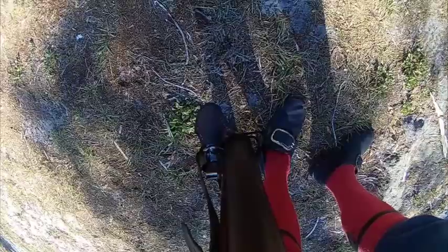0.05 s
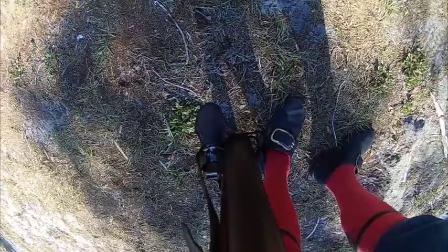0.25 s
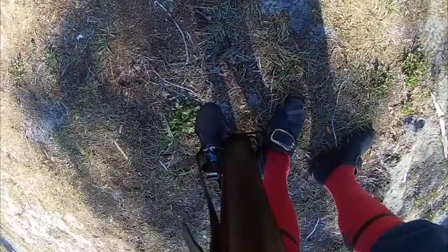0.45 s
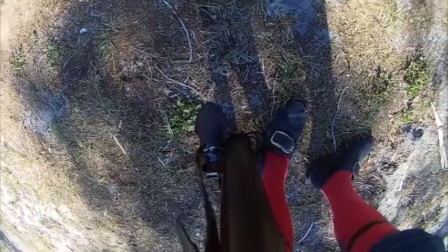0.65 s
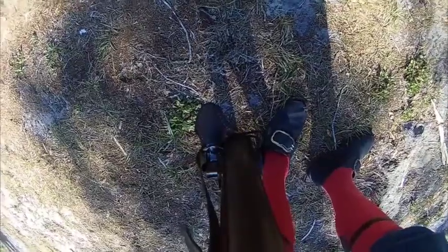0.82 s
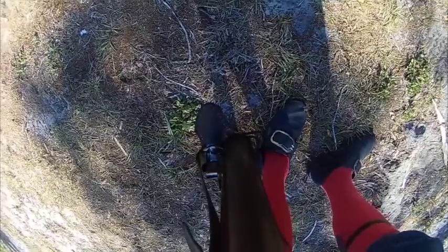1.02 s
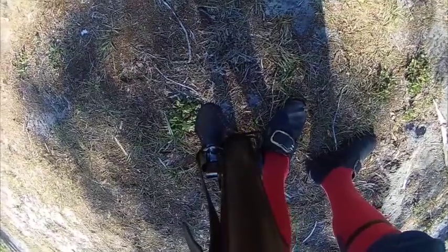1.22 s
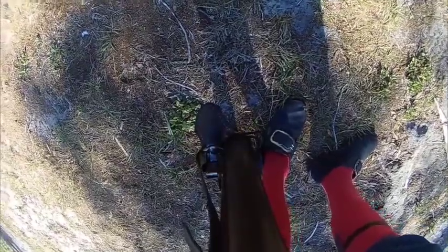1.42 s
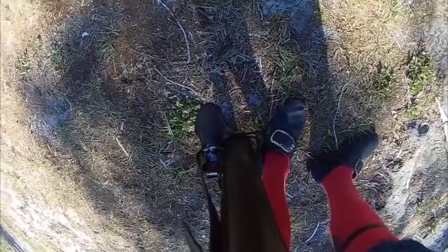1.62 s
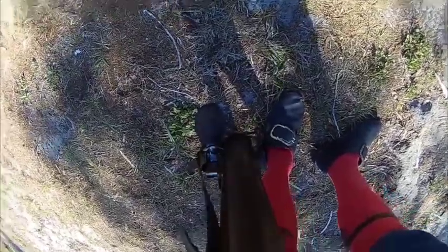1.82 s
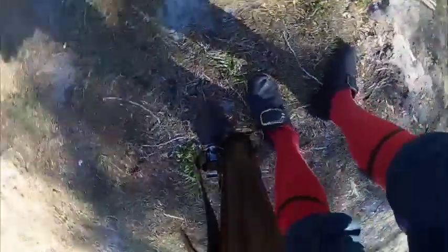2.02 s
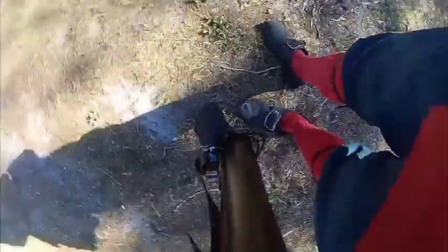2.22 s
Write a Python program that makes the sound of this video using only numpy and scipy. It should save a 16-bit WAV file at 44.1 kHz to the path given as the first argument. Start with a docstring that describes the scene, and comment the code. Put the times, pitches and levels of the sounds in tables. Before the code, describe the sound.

A ramrod scrapes and rattles inside a musket barrel, then knocks home once.

```python
"""Light taps and a thin scrape come first: a ramrod in a musket barrel, outdoors. It rattles and judders,
stops, slides once more and knocks home; then hands shift the gun. Every contact rings the barrel and
wooden stock, which carry it straight into the microphone of a camera fixed to the gun.
That close, the hard blows overload the microphone; the open air adds no echo, only a quiet floor."""
import sys
import numpy as np
from scipy import signal
from scipy.fft import rfft, irfft, next_fast_len
from scipy.io import wavfile
from scipy.ndimage import uniform_filter1d, map_coordinates

SR = 44100
rng = np.random.default_rng(int(sys.argv[2]) if len(sys.argv) > 2 else 0)


def dump_mix(stems):
    """Bounce the given channels to the path in sys.argv[1] as a 16-bit WAV at rate SR."""
    frames = np.atleast_2d(stems).T  # one column per channel
    limited = np.clip(frames, -1, 1)  # hard clip at full scale
    pcm = np.round(limited * 32767).astype(np.int16)
    wavfile.write(sys.argv[1], SR, pcm)


N = 103635


def amp(db):
    """Decibels to gain."""
    return 10 ** (np.asarray(db) / 20)


def unit(x):
    """Scale to rms 1."""
    return x / np.sqrt(np.mean(x ** 2) + 1e-20)


def levelled(x):
    """Scale so that the loudest moment has rms 1."""
    return x / np.sqrt(uniform_filter1d(x ** 2, size=400).max())


def gain_at(spectrum, hz):
    """Gain between (freq_hz, level_db) points on a log frequency axis."""
    freq_hz, level_db = np.transpose(spectrum)
    return amp(np.interp(np.log(hz + 1), np.log(freq_hz + 1), level_db))


def filtered(x, response):
    """Filter x by a complex response of frequency."""
    size = next_fast_len(len(x) + SR // 2)
    return irfft(rfft(x, size) * response(np.fft.rfftfreq(size, 1 / SR)), size)[:len(x)]


def noise(spectrum, size=N):
    """White noise coloured by (freq_hz, level_db) points."""
    return filtered(rng.standard_normal(size), lambda hz: gain_at(spectrum, hz))


def wobble(rate_hz, size):
    """A random curve with rate_hz knots a second."""
    return map_coordinates(rng.standard_normal(size // 8), [np.arange(size) * rate_hz / SR], order=1)


def add(track, start_s, sound):
    """Mix a sound in at start_s."""
    part = track[round(start_s * SR):][:len(sound)]
    part += sound[:len(part)]


# Spectrum of the open air around the microphone: freq_hz, level_db
AIR_SPECTRUM = [(20, 6.5), (120, 4.5), (300, -5.5), (700, -12), (1500, -15.5), (4000, -24), (9000, -27),
                (16000, -28.5)]

def outdoor_floor(level_db=-44.5):
    """A quiet, steady background, mostly bass."""
    return amp(level_db) * unit(noise(AIR_SPECTRUM))


# Resonances of barrel, stock and camera mount: centre_hz, width_hz, level_db
GUN_MODES = [(32.35, 5.2, -8.5), (107.9, 27, 5), (148.9, 34.4, 6.5), (190.6, 36, -0.5), (242.1, 27.7, 5),
             (293.45, 23.8, 8), (531, 45, 1.5), (698, 99, -6.5), (792, 52, -8), (917.3, 30, 6.5),
             (1268, 70, -4.5), (1363.5, 49, -3), (1548, 83, -0.5), (1728.5, 65.7, -1), (1943, 87.4, -11.5),
             (2640, 360, -22), (2900, 170, -18.5), (3515, 410, -19), (5600, 340, -22.5)]
# What the mount passes from gun to microphone: freq_hz, gain_db
MOUNT_RESPONSE = [(20, 2), (3800, -6), (4400, -23), (6000, -27), (9000, -26.5), (16000, -23.5)]

def gun(force, detune=0):
    """A force rings the gun, heard through the mount; white noise keeps its level."""
    def response(hz):
        f = hz * (1 + detune * (hz > 400))  # only the upper resonances shift
        modes = sum((-1) ** k * amp(db) * 1j * f * width / (centre ** 2 - f ** 2 + 1j * f * width)
                    for k, (centre, width, db) in enumerate(GUN_MODES))
        at_mic = modes * gain_at(MOUNT_RESPONSE, hz)
        return at_mic / np.sqrt(np.mean(abs(at_mic) ** 2))
    return filtered(force, response)


# Loudness of the hands at the microphone: time_s, level_db
RUB_LEVELS = [(0, -51), (.3, -30), (0.878, -22.5), (0.959, -52), (1.081, -50), (1.22, -51), (1.34, -43),
              (1.6, -31.5), (1.702, -37), (1.862, -28.5), (1.98, -42), (2.2, -35.5), (2.35, -32)]
# Spectrum of their force on the wood: freq_hz, level_db
RUB_SPECTRUM = [(20, 10), (45, 24.5), (100, 1.5), (300, -4), (550, -8.5), (1000, -12), (2000, -14),
                (5000, -4)]

def hand_rub():
    """Hands rub the stock, a low rustle that swells and fades."""
    level_db = np.interp(np.arange(N) / SR, *np.transpose(RUB_LEVELS))
    return amp(level_db) * unit(gun(noise(RUB_SPECTRUM)))


def push(width_s, pitch_hz=0, length_s=0.5):
    """A soft push, or a brief rocking at pitch_hz, rings the gun's low resonances; peak 1."""
    t = np.arange(int(length_s * SR)) / SR
    ring = gun(t ** 2 * np.exp(-t / width_s) * np.cos(2 * np.pi * pitch_hz * t))
    return ring / abs(ring).max()


def friction(bass_db, low_mid_db, treble_db, size=N, rough_db=1, catch_hz=301.3):
    """Force of steel rubbing steel, in tiny uneven catches."""
    colour = [(300, bass_db), (500, low_mid_db), (950, low_mid_db),
              (1400, 0.013), (1900, 0.014), (2800, treble_db)]
    return noise(colour, size) * unit(amp(rough_db * wobble(catch_hz, size)))


def rod_ping(t, range_hz=(687.7, 2004.3), t60_s=0.063):
    """Two bending modes of the rod, at pitches that vary with the point struck."""
    pitch_hz = rng.uniform(*range_hz, (2, 1))
    return np.sin(2 * np.pi * pitch_hz * t).sum(0) * amp(-60 * t / t60_s)


# The rod strikes the bore, within a gun's length of the microphone:
# start_s, level_db, chatter_t60_s, low_mid_db, treble_db, thud_db
ROD_BLOWS = [(0.0493, -20, 0.043, -8, -5, -19), (0.075, -18.5, 0.069, -7.5, -0.5, -54),
             (0.14, -21, 0.021, -11, -3.5, -19), (.184, -22.5, 0.15, 3, -15, -19.5),
             (.206, -14, 0.097, -8.5, 0, -35), (0.217, -12.5, 0.063, 0.5, -21, -47),
             (0.3347, -5, 0.023, -1.5, -4, -4.5), (0.3429, -3.5, 0.043, 19, 3, -1),
             (0.432, -24.5, 0.024, 1.5, -2, -25), (0.451, -12.5, 0.024, 3, 1, -29),
             (.494, -2, 0.026, 3, -8, -19), (.502, -21, 0.12, -13.5, -11, -40),
             (.558, -3, 0.029, 1, 10.5, -1.5), (0.6257, 2, 0.034, -4, 9.5, -14),
             (0.6632, 8.5, 0.038, -0.5, 13.5, 5.5), (0.681, 0.5, 0.018, 11, 1, 5.5),
             (.707, 4, 0.043, 1.5, 6, 9), (0.7363, 0, 0.012, 0, 6, 0), (0.7546, 6, 0.06, -3.5, -30, -7),
             (0.777, 3.5, 0.024, 8.5, 6, 5.5), (.787, 1.5, 0.079, -7.5, 12, -3.5),
             (.802, 4.5, 0.013, 9.5, -18, -4), (0.828, -6, 0.017, -12, -10, 1.5),
             (0.847, -8, 0.0295, 9, 8, -1), (0.8697, -10, 0.034, -23, 4, -2.5),
             (0.8752, -4.5, 0.022, 6.5, 0, -28), (1.4743, 8, 0.019, 0.5, 0.5, 2),
             (1.612, -27, 0.016, -17, -7, -52), (1.644, -31.5, 0.061, 0, -9, -42.5),
             (1.812, -22.5, 0.022, -2.5, 12.5, -24), (2.115, -27, 0.04, 3.5, -4, -27),
             (2.283, -33, 0.066, -3.5, -0.5, -16.5)]

def rod_blows(ping_db=-4.5, detune_spread=0.025):
    """Each blow is a thud, a ping and a quickly dying chatter of the rod against the bore."""
    out = np.zeros(N)
    thud = push(width_s=0.0007)
    t = np.arange(len(thud)) / SR
    for start_s, level_db, chatter_t60_s, low_mid_db, treble_db, thud_db in ROD_BLOWS:
        bass_db = low_mid_db - 2.5
        force = amp(-60 * t / chatter_t60_s) * friction(bass_db, low_mid_db, treble_db, len(t))
        detune = rng.normal(0, detune_spread)  # the rod's place in the bore shifts the resonances
        chatter = levelled(gun(force, detune))
        ping = amp(ping_db + min(level_db, 0) / 2) * rod_ping(t)  # light taps barely ring the rod
        add(out, start_s, amp(level_db) * levelled(chatter + ping) + amp(thud_db) * thud)
    return out


# Strokes of the rod along the bore, heard through the gun:
# start_s, end_s, first_db, last_db, bass_db, low_mid_db, treble_db, squeal_hz, squeal_db
ROD_SLIDES = [(0.07, 0.2, -41.5, -32, -4.5, 3, -2, 910, -31),
              (0.248, 0.329, -28.5, -14.5, -11.5, 2.5, 4.5, 1780, 1),
              (0.424, 0.478, -53, -26, -6.5, -23, 7, 1580, 11.5),
              (0.52, 0.577, -22, -19, 12, 2.5, 16, 950, -1), (0.557, .612, -18, -24, 9.5, 1, 8, 1000, 6.5),
              (0.608, 0.663, -6, -11.5, 4, 2.5, 1.5, 1400, -11),
              (0.678, 0.771, -7.5, -7.5, 12, 4.5, 11.5, 1400, 7),
              (.775, 0.817, 1.5, -10, 8, -2, 1, 746, 21), (0.819, 0.869, -8.5, -13, 8.5, -3, 9.5, 900, 3),
              (0.884, 0.904, -21, -24.5, 10.5, 3, 4, 930, -10),
              (1.377, 1.417, -28, -16.5, -8, -3.5, 7.5, 3830, -3),
              (1.402, 1.469, -20, -12.5, -14, -9, 13.5, 5700, -2),
              (1.56, 1.588, -41, -40, -12, 3, 19, 3430, 2),
              (1.59, 1.612, -26, -31, -32, -1.5, 13, 3130, -5),
              (1.709, 1.723, -22, -26, -18, -19, 4, 5700, 15),
              (1.744, 1.757, -7, -18.5, -28, -16.5, -1, 5650, 14),
              (1.769, 1.797, -22.5, -28.5, -25, -15, -1, 1720, 7.5),
              (2.154, 2.183, -33, -54, 13, 3.5, -13, 1000, 3),
              (2.311, 2.36, -27.5, -21.5, -7, -8.5, 6.5, 4630, 13)]

def rod_slides(edge_s=0.011, squeal_octaves=0.16, judder_db=6.5, judder_hz=131, judder_onset_db=-26):
    """Friction grows or eases along each stroke and squeals in one band; pressed hard, the rod judders."""
    t, force = np.arange(N) / SR, np.zeros(N)
    for start_s, end_s, first_db, last_db, *colour_db, squeal_hz, squeal_db in ROD_SLIDES:
        def squeal(hz):
            octaves_off = np.log2((hz + 1) / squeal_hz)
            return 1 + amp(squeal_db) * np.exp(-(octaves_off / squeal_octaves) ** 2)
        gate = np.clip(np.minimum(t - start_s, end_s - t) / edge_s + 0.5, 0, 1)
        level_db = np.interp(t, [start_s, end_s], [first_db, last_db])
        pressure = np.clip(1 - level_db / judder_onset_db, 0, 1)
        stick_slip_db = judder_db * pressure * (wobble(judder_hz, N) - 0.5)
        scrape = filtered(friction(*colour_db), squeal)
        force += gate * amp(level_db + stick_slip_db) * scrape
    return gun(force)


# Dull thumps of the stock, carried up the mount: start_s, peak_db, pitch_hz
STOCK_THUMPS = [(0.23, -14.5, 140), (.343, 4, 160), (0.376, -13.5, 134), (.564, -2, 120), (0.581, 3.5, 116),
                (0.599, -5, 116), (.885, -26.5, 280), (0.921, -24.5, 272), (0.954, -30.5, 205),
                (1.246, -23.5, 125), (1.483, 3, 112), (1.756, -23.5, 130), (1.809, -15, 143),
                (1.862, -22, 130), (1.914, -30, 220), (2.053, -21.5, 173), (2.163, -20.5, 150),
                (2.213, -26, 130), (2.277, -17, 175)]

def stock_thumps(width_s=0.0038):
    """Low thumps and brief ringing of the stock, under the rod's blows and as the gun is handled."""
    out = np.zeros(N)
    for start_s, peak_db, pitch_hz in STOCK_THUMPS:
        add(out, start_s, amp(peak_db) * push(width_s, pitch_hz))
    return out


# Deep thumps as gun and microphone move together: start_s, peak_db
GUN_SWAYS = [(0.347, -13.5), (0.788, -5.5), (0.953, -24.5), (1.29, -32), (1.485, -41), (2.076, -27)]

def gun_sways(width_s=0.011):
    """The whole gun sways after hard blows, a slow push on its lowest resonance."""
    out = np.zeros(N)
    for start_s, peak_db in GUN_SWAYS:
        add(out, start_s, amp(peak_db) * push(width_s))
    return out


def scene():
    """Rod, hands and stock over the outdoor floor, in mono."""
    rod = rod_blows() + rod_slides()
    stock = hand_rub() + stock_thumps() + gun_sways()
    return (rod + stock + outdoor_floor())[None]


def record(dry):
    """The microphone on the gun clips hard; its coupling tilts the flat tops; the band ends steeply."""
    ceiling, hardness = 0.7, 33
    coupling_hz, top_hz = 10, 16000
    def response(hz):
        coupling = 1j * hz / (coupling_hz + 1j * hz)
        return coupling / np.sqrt(1 + (hz / top_hz) ** 120)
    oversampled = signal.resample_poly(dry[0], 2, 1)
    clipped = oversampled / (1 + abs(oversampled / ceiling) ** hardness) ** (1 / hardness)
    return filtered(signal.resample_poly(clipped, 1, 2), response)[None]


dry = scene()
out = record(dry)
dump_mix(out)
```